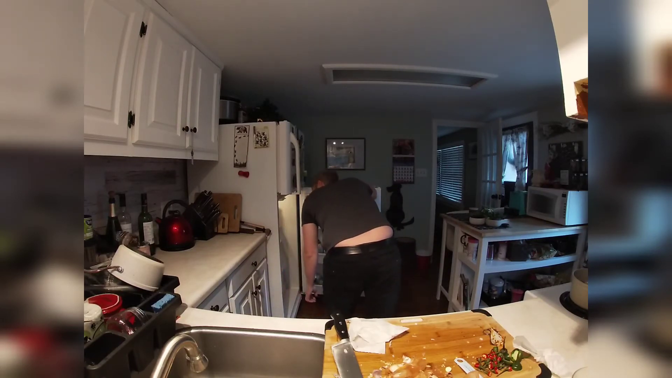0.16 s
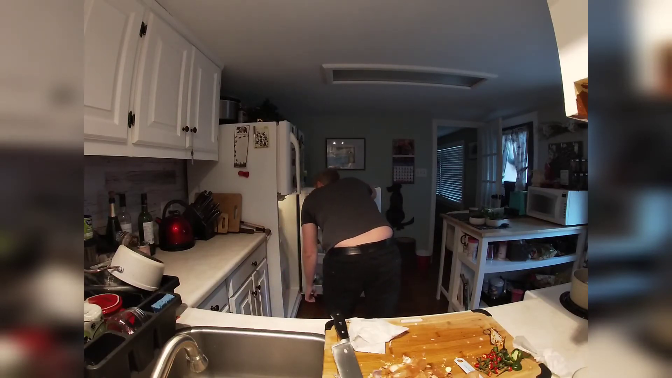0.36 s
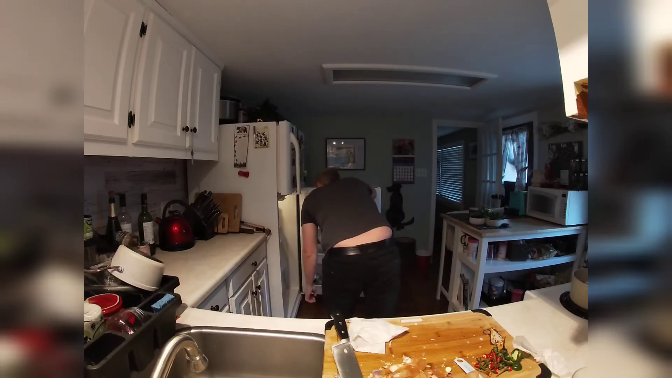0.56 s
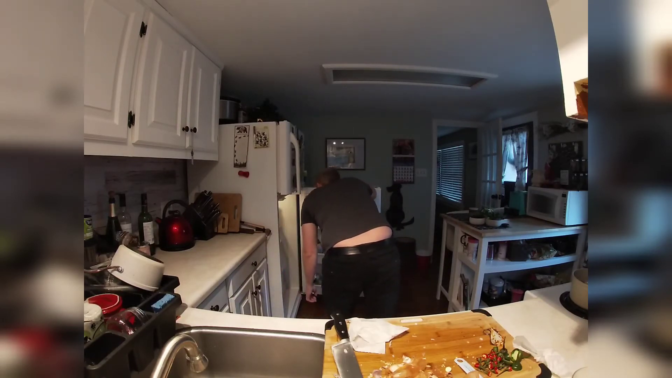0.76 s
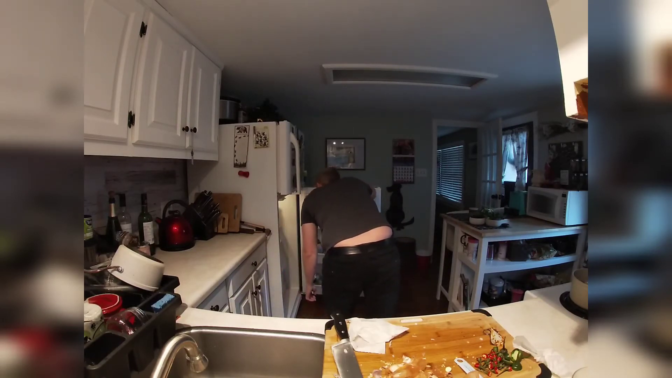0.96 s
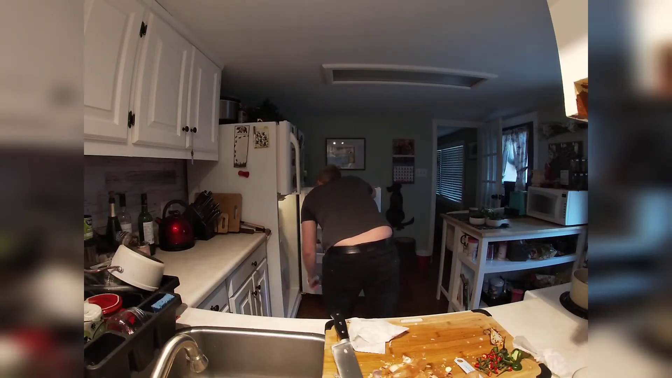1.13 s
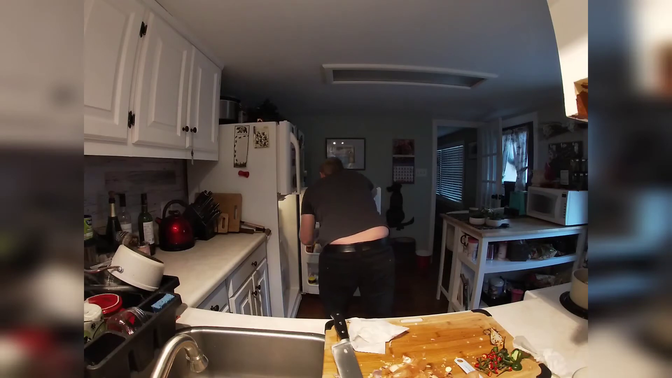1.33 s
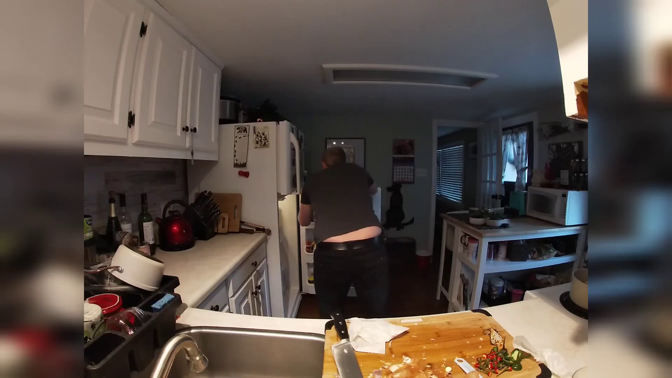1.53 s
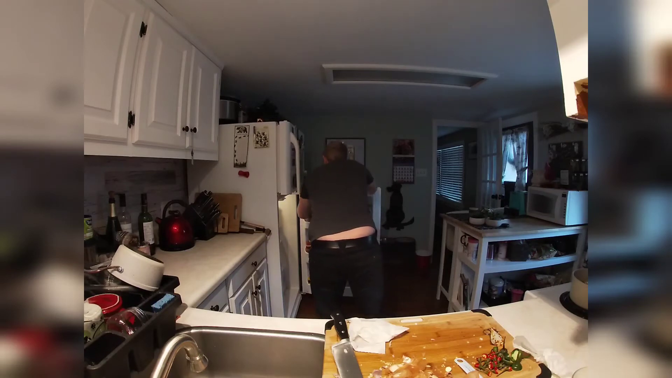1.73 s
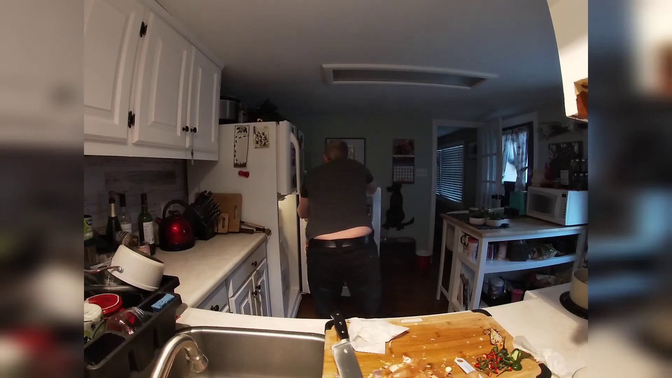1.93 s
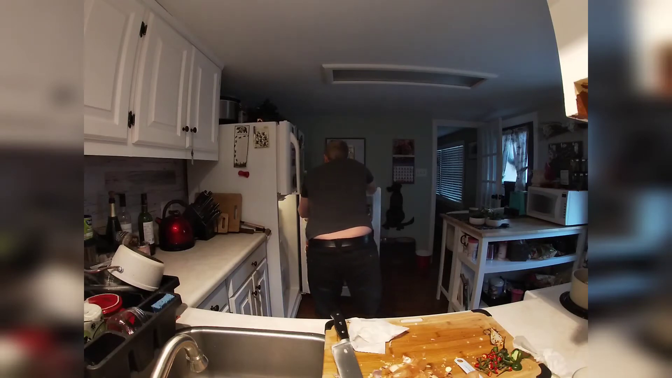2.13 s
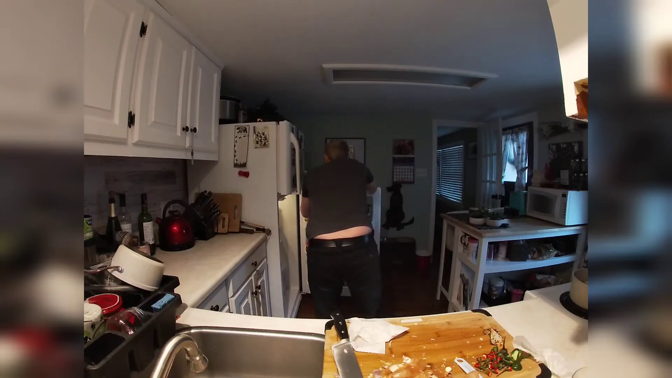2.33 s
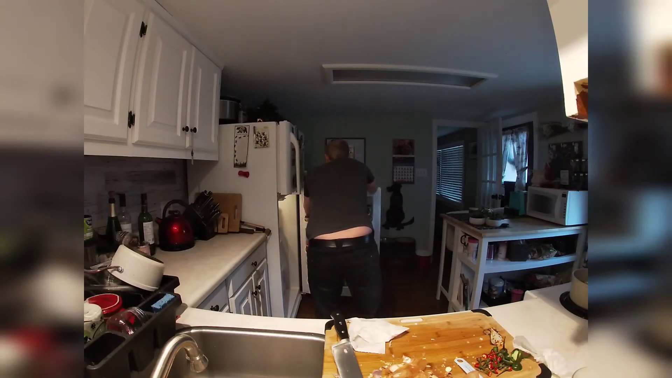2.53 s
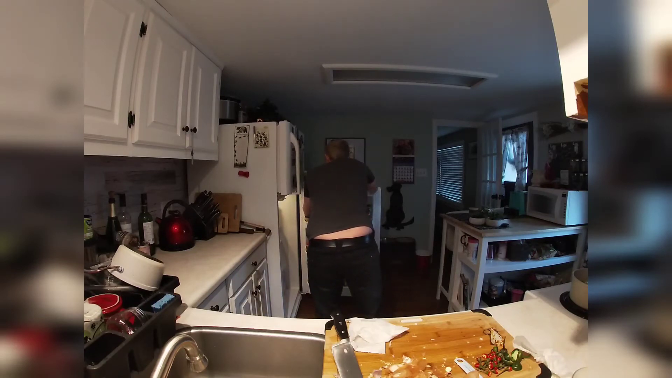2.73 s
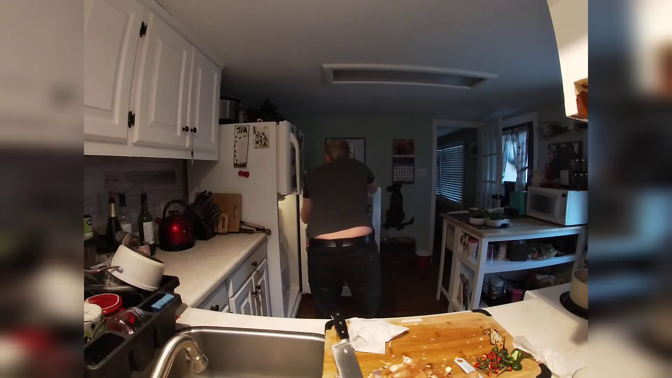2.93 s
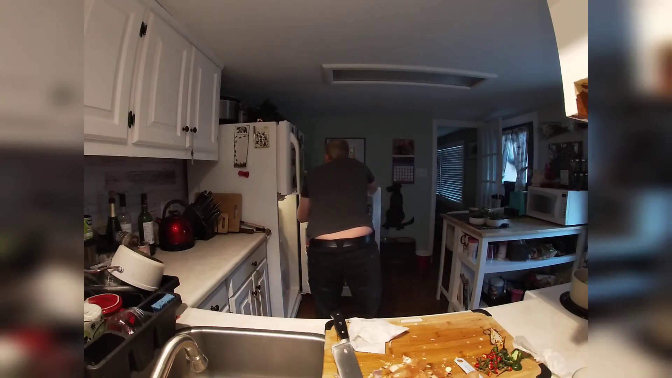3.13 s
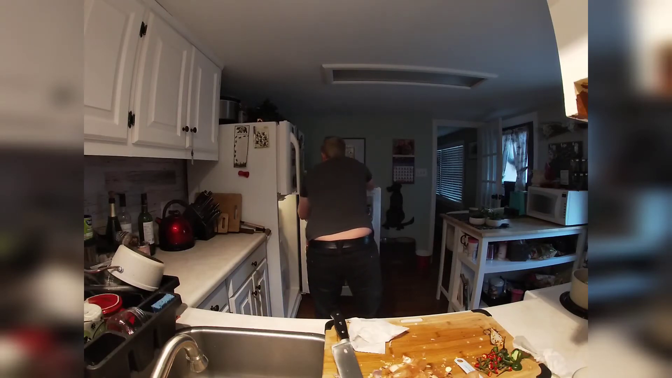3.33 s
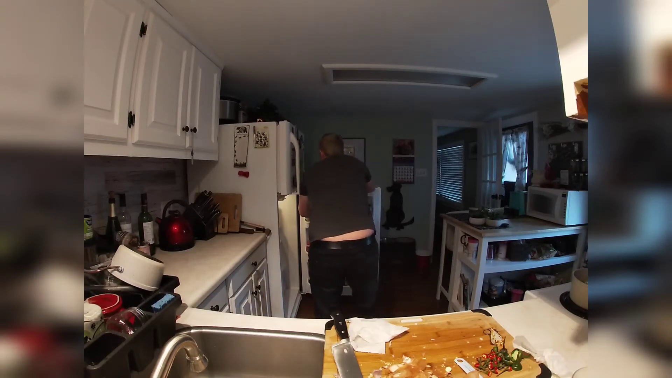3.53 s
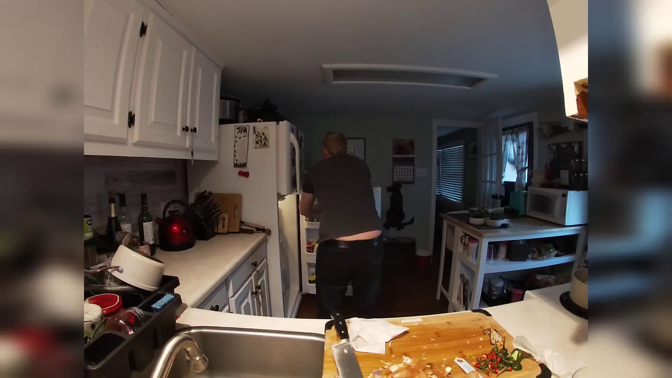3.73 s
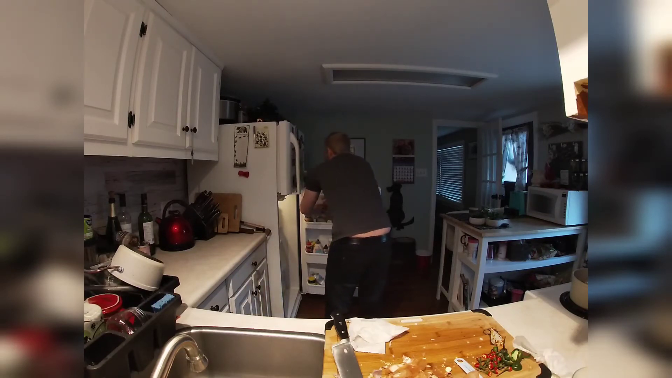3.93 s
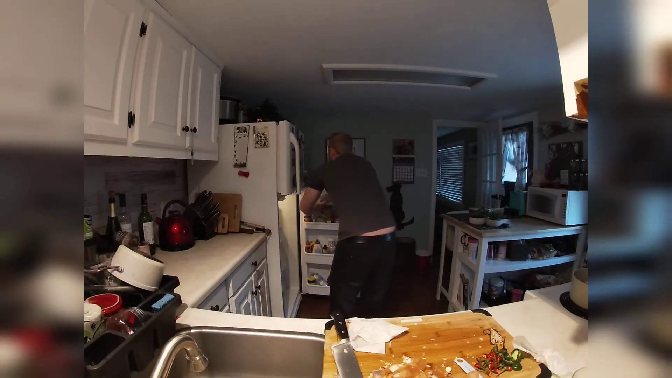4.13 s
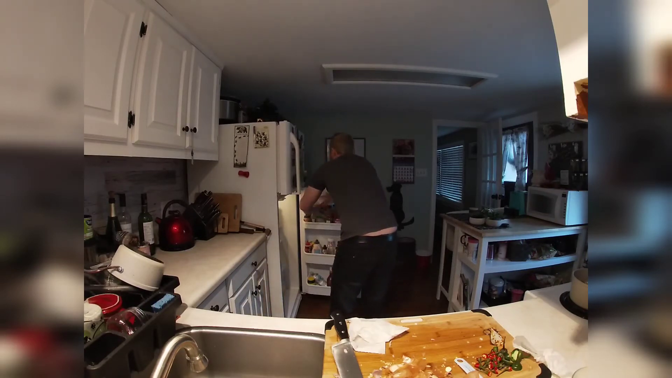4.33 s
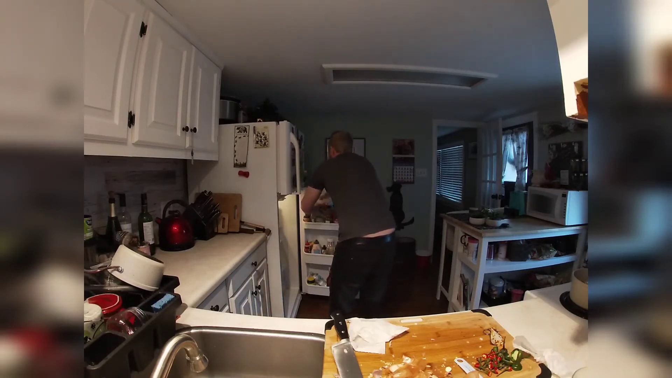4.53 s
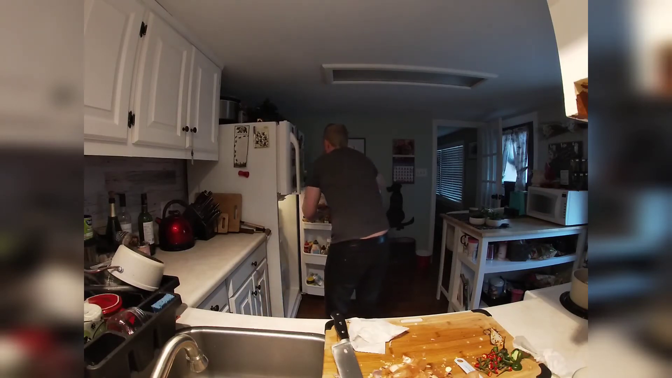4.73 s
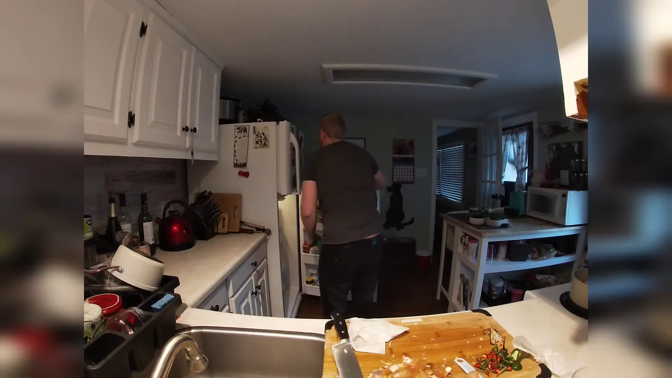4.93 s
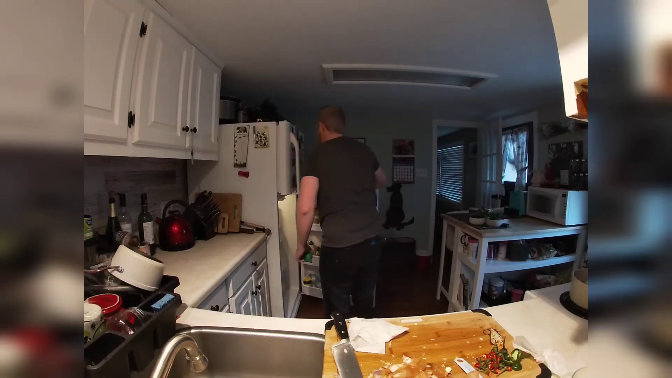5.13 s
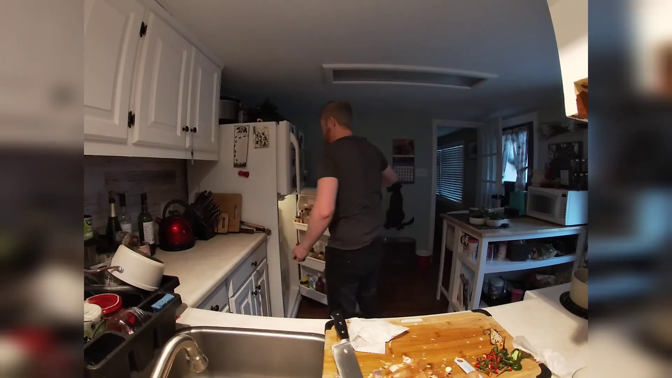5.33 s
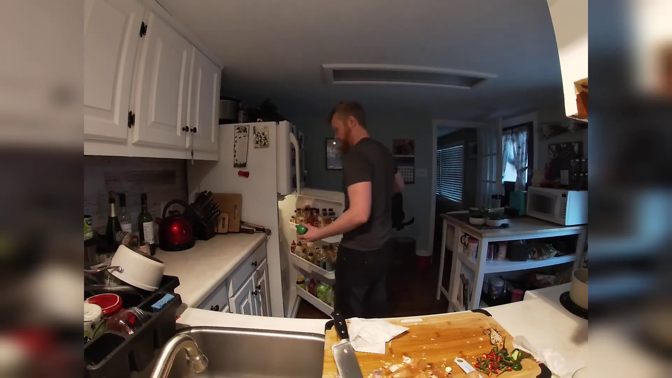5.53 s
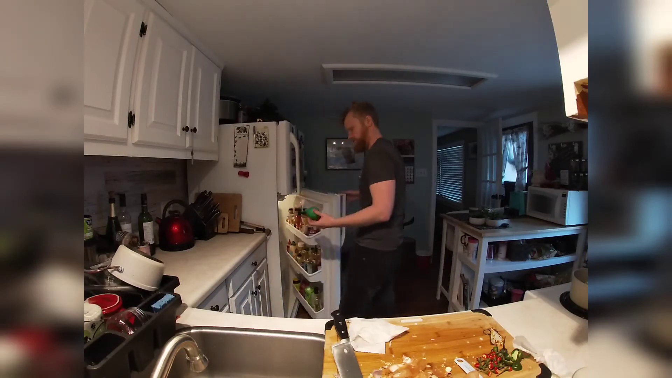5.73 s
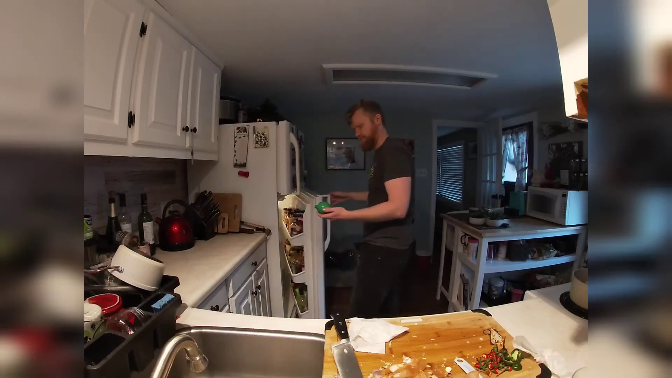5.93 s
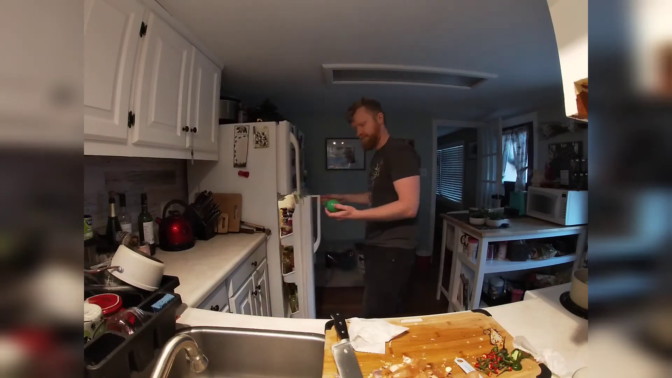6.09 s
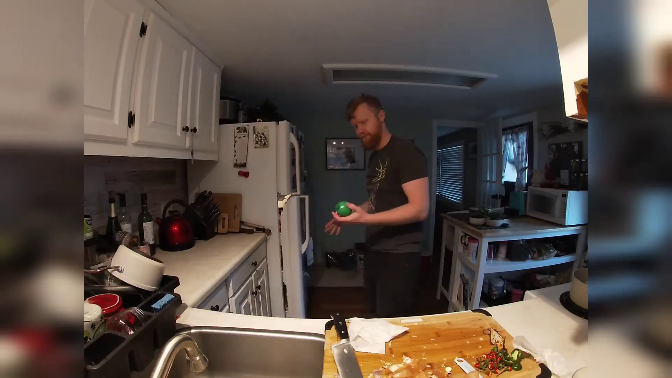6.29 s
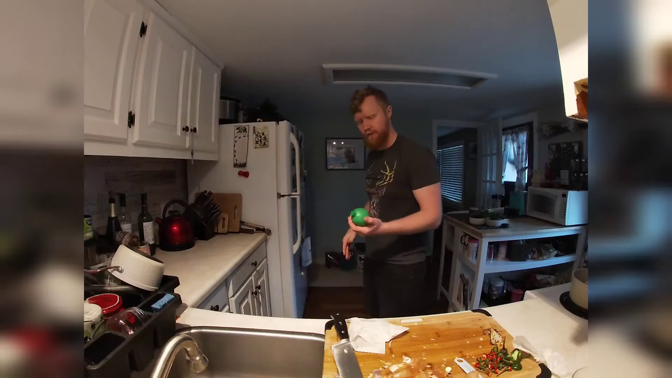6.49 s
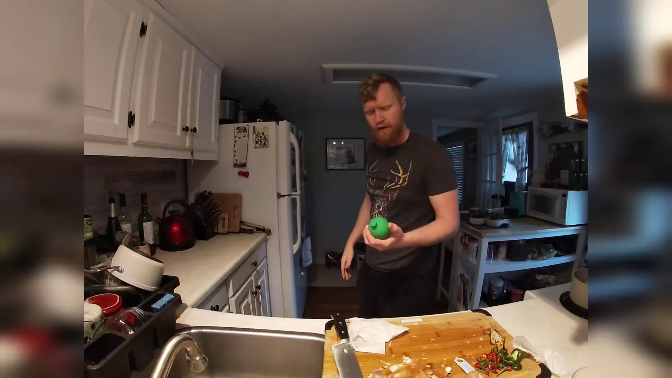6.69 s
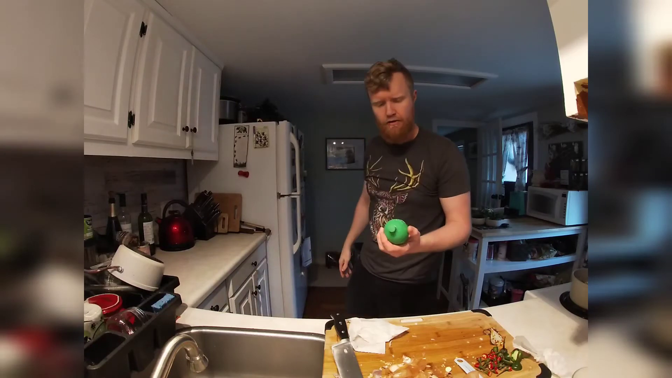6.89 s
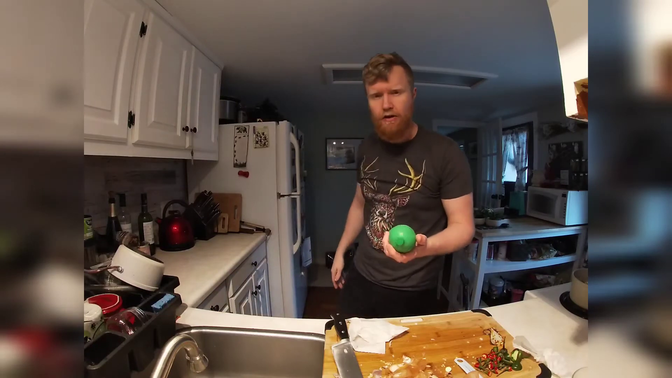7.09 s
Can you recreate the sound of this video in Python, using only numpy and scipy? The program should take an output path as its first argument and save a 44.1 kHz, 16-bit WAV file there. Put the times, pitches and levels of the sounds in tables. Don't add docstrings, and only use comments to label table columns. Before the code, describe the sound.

A refrigerator motor hums with a soft fan rush in a small, hard-walled kitchen. After a quiet start, a plastic drawer rumbles and thuds along its rails. Light bottle nudges and wrapper crinkles follow, then a cluster of sharp clacks, glass clinks and hollow shelf thuds. Faint rustling leads to a loud door slam with deep air thump, rattle and bounce, and the hum is muffled. A small microphone sits nearby.

```python
import sys
import numpy as np
from scipy import signal
from scipy.fft import rfft, irfft
from scipy.io import wavfile
from scipy.ndimage import map_coordinates

SR = 44100
rng = np.random.default_rng(int(sys.argv[2]) if len(sys.argv) > 2 else 0)


def store_pcm(level_fs):
    pcm = np.round(np.clip(level_fs, -1, 1) * 32767).astype(np.int16)
    wavfile.write(sys.argv[1], SR, np.atleast_2d(pcm).T)


def invert_db(x):
    u = np.asarray(x, float) / 20
    return 10 ** u


N = 315403

# start in seconds, strength in dB,
# weight in dB (how much the hollow shelf answers), hardness in dB (how much the edge ticks).
SET_DOWNS = [(1.103, -57, -5, -21), (1.185, -46.5, -20, -8.5), (1.4456, -52, -12, -12),
             (1.8552, -38, -5, -19), (1.8951, -20, -8.5, -13), (1.996, -29, -3, -10.5),
             (2.32, -43.5, 6, -11.5), (2.8654, -59, 8, 2.5), (2.9475, -55.5, 7, -1), (3.1166, -52, -7, -8),
             (3.1626, -51.5, -0.5, -5), (4.403, -35, -8, -6.5), (4.588, -42.5, -8, -9),
             (4.6384, -31.5, 0, -12), (4.7035, -29, -1, -6.5), (4.925, -54, 4, -9),
             (6.489, -29, 1.5, -12.5), (6.9485, -37, -19, -14)]
# start in seconds, strength, weight and hardness in dB.
NUDGES = [(2.2522, -43, 6, -14), (2.6728, -60, 1, -6), (2.736, -51, -18, -1), (3.4191, -51.5, 0, -10),
          (3.8187, -50.5, 8.5, -9), (3.8521, -36.5, -3, -17), (4.1445, -55.5, 17.5, -17),
          (4.4573, -22.5, -0.5, -11), (4.9861, -55, 8, -18)]
# start in seconds, strength, weight and hardness in dB.
SLAPS = [(1.8747, -39, -2, -21), (1.9226, -33.5, -5, -24), (2.0494, -64, 15, 4), (3.636, -45.5, -19.5, -16),
         (3.6977, -56.5, 17, -12), (4.7405, -35, -27, -22), (6.4787, -32, -4, -14), (6.497, -40, 4.5, -17)]
# start in seconds, strength, weight and hardness in dB.
CRACKS = [
    (2.9015, -29.5, -21, -10.5),
    (2.925, -41, -13, -3.5),
    (4.4485, -26.5, -13, -5.5),
    (6.5536, -49, 5, 0),
    (6.5815, -9, -11, -16),
    (6.6672, -21.5, -6.5, -14),
]
# start in seconds, peak in dB, pitch in Hz.
DRAWER_THUDS = [(1.871, -18, 252), (1.905, -9.5, 313), (1.918, -14, 427), (1.939, -19, 302),
                (1.959, -19, 194), (1.979, -16, 190), (1.999, -17.5, 336), (2.024, -15.5, 251),
                (2.049, -16.5, 231), (2.089, -20.5, 209), (2.254, -26, 213)]
# start in seconds, peak in dB, pitch in Hz.
SHELF_THUDS = [(3.802, -31, 129), (4.466, -25, 314), (4.469, -10, 243), (4.519, -19.5, 257),
               (4.549, -26.5, 327), (4.575, -18, 272), (4.609, -23, 300), (4.646, -26.5, 196),
               (4.652, -10.5, 298), (4.669, -15.5, 245.4), (4.69, -17, 272), (4.729, -17.5, 232),
               (4.77, -29, 212)]
# start in seconds, peak in dB, pitch in Hz.
DOOR_THUDS = [
    (6.492, -9.5, 198),
    (6.494, -16, 352),
    (6.509, -17.5, 237),
    (6.56, -21, 196),
    (6.583, -12.5, 114),
    (6.595, -32, 340),
    (6.68, -22, 151),
    (6.683, -30, 335),
]
# frequency in Hz, level in dB, T60 in seconds.
JAR_MODES = [(1232, 0, 0.1), (2630, -6, 0.088), (3200, -6, 0.24), (3840, -4, 0.062), (4530, -22, 0.28),
             (4800, -28, 0.12), (5030, -14, 0.32), (6450, -15, 0.056), (7260, -5, 0.053),
             (7200, -24, 0.091)]
# start in seconds, level in dB, frequency in Hz.
PINGS = [(1.897, -21, 837), (1.898, -23, 3220), (1.898, -32, 6800), (1.901, -34, 1230), (2.321, -37, 1296),
         (2.323, -33, 636), (2.903, -37, 3300), (2.903, -43, 1260), (2.906, -45, 6350), (2.907, -45, 7500),
         (3.117, -46.5, 7160), (3.819, -48, 3240), (3.852, -39, 3380), (3.86, -38, 906), (4.460, -26, 3120),
         (4.462, -28, 1680), (4.463, -28, 7360), (4.575, -44, 1405), (4.645, -33, 850), (4.99, -50, 4470),
         (6.493, -21, 697), (6.494, -27, 2230), (6.496, -27.5, 2630)]
# time in seconds, level in dB, tilt to the upper bands in dB.
SKID = [(.40, -94, 17), (.415, -72, 17), (.445, -57, -1), (.475, -48.5, -14), (.505, -58.5, -17),
        (.535, -87, -14), (.56, -110, -13)]
# frequency in Hz, width in Hz, level in dB.
SKID_BANDS = [(1770, 300, 0), (2900, 1600, -9), (3850, 700, -9), (4600, 900, -10), (6950, 250, -16),
              (11300, 900, -22)]
# start in seconds, level in dB.
CLIPS = [(1.997, -50), (2.9, -53), (4.01, -58), (6.488, -51), (6.553, -43), (6.5815, -34)]
# start in seconds, hold in seconds, rumble in dB, rattle in dB.
SHAKES = [(1.802, 0.056, -43, -63), (1.861, 0.065, -46, -38), (1.951, 0.086, -38.5, -37.5),
          (2.301, 0.033, -60, -57), (3.41, .05, -50, -70), (3.688, 0.046, -51, -55.5),
          (3.789, 0.027, -51.5, -64), (3.85, .02, -54, -65), (4.132, 0.011, -45, -55),
          (4.436, 0.015, -32, -45), (4.562, .015, -50, -62), (4.635, 0.043, -38, -51),
          (4.912, 0.08, -64, -58), (6.49, 0.028, -50, -54), (6.566, 0.012, -33, -41),
          (6.658, .02, -46.5, -52)]
# frequency in Hz, level in dB, T60 in seconds.
SHELF_MODES = [(113.3, -14, 0.13), (212, -3, 0.1), (252, 10, 0.18), (331, 5.5, 0.15), (420, -15, 0.084)]
# frequency in Hz, width in Hz, level in dB.
DRAWER_WALLS = [(774, 140, -9), (1414, 105, 4), (1685, 79, -0.5), (1863, 22, 7), (2850, 99, -15.5),
                (3100, 38, -12.5)]
# start in seconds, hold in seconds, level in dB, brightness in dB.
RUMMAGES = [(1.433, 0.17, -68.5, -1), (1.757, .04, -58, -4), (2.055, 0.14, -56.5, -0.5),
            (3.403, 0.09, -60.5, -1), (3.596, 0.045, -55, -3.5), (3.675, 0.016, -57, -4.5),
            (3.896, 0.062, -61.5, 1.5), (3.978, 0.024, -53, -1), (4.18, 0.27, -54.5, -0.2),
            (4.497, .01, -56, -6), (4.544, 0.007, -54, -5.5), (4.762, 0.043, -57, -3.5),
            (4.942, 0.024, -61.5, -2.5), (5.09, 0.11, -66, -2.5), (5.354, 0.39, -66, -1.5),
            (5.85, .3, -73, -1.5), (6.206, .25, -65, -3), (6.934, 0.018, -53, -3.5), (6.996, .15, -64, -8)]
# frequency in Hz, density in dB per Hz.
CRINKLE_SPECTRUM = [(880, -2), (1500, -2.5), (1930, -6), (2040, -7.5), (3320, -3), (3850, -6), (6450, -4.5),
                    (7140, -3.5), (9020, -17.5), (12500, -24), (14000, -37)]
# time in seconds, level in dB.
MOTOR_LEVEL = [(0, -43), (1.1, -39.5), (2.07, -44.5), (2.4, -42), (4.4, -39.5), (4.62, -46), (4.8, -42.5),
               (6.49, -42.5), (6.8, -61), (7.15, -46)]
# frequency in Hz, width in Hz, level in dB.
WHINES = [(179.2, 6, 0), (364.2, 20, -11.5), (508.8, 23.5, -17), (1259.4, 60, -26), (1968, 11.7, -32)]
# frequency in Hz, density in dB per Hz.
FAN_SPECTRUM = [(18, -24.5), (30, -19), (123, -9.5), (144, -9.5), (160, -11.5), (181, -3), (206, -7),
                (296, -4.5), (383, -17.5), (508, -14), (991, -29.5), (1930, -34.5), (2370, -44),
                (7360, -47), (14000, -78)]
# start in seconds, hold in seconds, level in dB.
SHUDDERS = [
    (3.7, 0.11, -58),
    (4.5, 0.064, -46),
    (6.5, 0.065, -34.5),
    (6.9, .25, -55),
]
# start in seconds, hold in seconds, level in dB.
GUSTS = [(.56, .05, -52), (1.98, 0.096, -45), (3.4, 0.26, -49), (3.76, .01, -31.5), (3.9, 0.33, -53),
         (4.47, 0.33, -50), (4.9, 0.19, -49), (5.68, 0.041, -46), (6.0, 0.23, -58), (6.44, 0.31, -48),
         (6.70, 0.085, -34.5)]
# start in seconds, peak in dB, frequency in Hz, T60 in seconds.
JOLTS = [
    (2.043, -26, 110, 0.42),
    (3.795, -27.5, 17.7, 0.43),
    (4.639, -21.5, 99, 0.21),
    (4.83, -36, 95, 0.19),
    (4.961, -36.5, 105, 0.35),
    (6.499, -22, 25, 0.27),
    (6.597, -5.5, 24.6, 0.19),
    (6.699, -10, 104, 0.086),
    (6.899, -27, 98, 0.12),
]


def rms_one(x):
    return x / np.sqrt(np.mean(x ** 2) + 1e-20)


def in_time(rows):
    seconds, *columns = np.transpose(rows)
    return [np.interp(np.arange(N) / SR, seconds, column) for column in columns]


def band(x, low_hz, high_hz, order=2):
    return signal.sosfilt(signal.butter(order, [low_hz, high_hz], "band", fs=SR, output="sos"), x)


def drift(rate_hz):
    knots = rng.standard_normal(int(N / SR * rate_hz * 2) + 400)
    position = np.arange(N) / SR * rate_hz * 2
    return map_coordinates(knots, [position], order=2)


def coloured(spectrum):
    hz, db = np.transpose(spectrum)
    log_hz = np.log(np.fft.rfftfreq(N, 1 / SR) + 1)
    gain = invert_db(np.interp(log_hz, np.log(hz), db))
    return rms_one(irfft(rfft(rng.standard_normal(N)) * gain, N))


def resonate(x, hz, width_hz):
    r = np.exp(-np.pi * width_hz / SR)
    feedback = [1, -2 * r * np.cos(2 * np.pi * hz / SR), r * r]
    return signal.lfilter(np.array([1, 0, -1]) * (1 - r * r) / 2, feedback, x)


def narrow_noise(x, hz, width_hz):
    return rms_one(resonate(resonate(x, hz, width_hz), hz, width_hz))


def ring(clicks, hz, t60):
    r = invert_db(-60 / (t60 * SR))
    w = 2 * np.pi * hz / SR
    return signal.lfilter([0, np.sin(w)], [1, -2 * r * np.cos(w), r * r], clicks + 1e-18)


def grains(per_s, spread_db):
    sizes = invert_db(spread_db * np.minimum(rng.exponential(1, N), 4)) * rng.choice([-1, 1], N)
    return rms_one(sizes * (rng.random(N) < per_s / SR))


def strikes(seconds, level_db):
    clicks = np.zeros(N)
    clicks[(np.asarray(seconds) * SR).astype(int)] = invert_db(level_db)
    return clicks


def swell(t, t60, rise_s):
    return (1 - np.exp(-t / rise_s)) * invert_db(-60 * t / t60)


def strokes(rows, attack_s, t60):
    t, out = np.arange(SR) / SR, np.zeros(N + SR)
    for s, hold, db in rows:
        rise = np.clip(t / attack_s, 0, 1) ** 2
        fall_db = -60 * np.maximum(t - attack_s - hold, 0) / t60
        start = int(s * SR)
        out[start:start + SR] += rise * invert_db(db + fall_db)
    return out[:N]


def knocks():
    t = np.arange(SR // 4) / SR
    levels = np.zeros((4, N + SR))
    # contacts, body in dB over the mean of clack and hollow, chatter T60 in seconds
    for rows, body_db, t60 in [(SET_DOWNS, -3.5, 0.088), (NUDGES, -11.5, 0.078),
                               (SLAPS, 5.9, 0.078), (CRACKS, -1.3, 0.044)]:
        shape = swell(t, t60, rise_s=0.0014)
        for s, db, weight_db, hard_db in rows:
            hollow, body = weight_db + 14.5, weight_db / 2 + body_db + 11
            clack, tick = 3.0, hard_db + 9.5
            registers_db = db + np.array([[hollow], [body], [clack], [tick]])
            start = int(s * SR)
            levels[:, start:start + len(t)] += invert_db(registers_db) * shape
    chatter = [grains(16000, spread_db=2.0) * level for level in levels[:, :N]]
    edges_hz = [450, 1100, 2800, 5000, 8300]
    registers = sum(band(chatter[k], edges_hz[k], edges_hz[k + 1], order=4) for k in range(4))
    sharpest_edge = band(chatter[3], 5700, 14000) * invert_db(-20.0)
    return registers + sharpest_edge


def thuds():
    t, out = np.arange(SR // 3) / SR, np.zeros(N + SR)
    modes = [(0.973, 1.0), (0.714, 0.15), (1.37, 0.34)]
    for rows, t60 in [(DRAWER_THUDS, 0.077), (SHELF_THUDS, 0.079), (DOOR_THUDS, 0.12)]:
        for s, db, hz in rows:
            tone = sum(gain * np.sin(2 * np.pi * hz * ratio * t) for ratio, gain in modes)
            start = int(s * SR)
            out[start:start + len(t)] += invert_db(db) * tone * swell(t, t60, rise_s=0.0016)
    return out[:N]


def glass():
    clink_s, clink_db = 4.706, -27.5
    ping_t60_s, ping_loss = 0.06, 0.3
    clink = sum(ring(strikes([clink_s], clink_db + db), hz, min(t60, 0.2) * 0.54) for hz, db, t60 in JAR_MODES)
    pings = sum(ring(strikes([s], db), hz, ping_t60_s * (1e3 / hz) ** ping_loss) for s, db, hz in PINGS)
    return clink + pings


def skid():
    level_db, tilt_db = in_time(SKID)
    rub = grains(6600, spread_db=4.0)
    bands = [invert_db(db) * narrow_noise(rub, hz, width) for hz, width, db in SKID_BANDS]
    return invert_db(level_db) * (sum(bands[:3]) + invert_db(tilt_db) * sum(bands[3:]))


def clips():
    level = strokes([(s, 0, db) for s, db in CLIPS], attack_s=0.001, t60=0.063)
    return band(level * grains(9000, spread_db=1.0), 7500, 11300)


def slides():
    attack_s, t60_s = 0.014, 0.29
    rumble_level = strokes([(s, hold, db) for s, hold, db, _ in SHAKES], attack_s, t60_s)
    rattle_level = strokes([(s, hold, db) for s, hold, _, db in SHAKES], attack_s, t60_s)
    slips = grains(2500, spread_db=3.5)
    rumble = sum(invert_db(db) * resonate(slips, hz, 5 / t60) for hz, db, t60 in SHELF_MODES)
    walls = sum(invert_db(db) * (-1) ** k * resonate(slips, hz, width)
                for k, (hz, width, db) in enumerate(DRAWER_WALLS))
    rattle = rms_one(walls) + 0.63 * rms_one(band(slips, 410, 2130))
    return rumble_level * rms_one(rumble) + rattle_level * rms_one(rattle)


def rustle():
    attack_s, t60_s = 0.024, 0.43
    low = strokes([(s, hold, db - tilt) for s, hold, db, tilt in RUMMAGES], attack_s, t60_s)
    high = strokes([(s, hold, db + tilt) for s, hold, db, tilt in RUMMAGES], attack_s, t60_s)
    crinkle = coloured(CRINKLE_SPECTRUM) * invert_db(1.5 * drift(30))
    dull = signal.lfilter(*signal.butter(2, 4000, fs=SR), crinkle)
    return low * dull + high * (crinkle - dull)


def fridge():
    motor_db, = in_time(MOTOR_LEVEL)
    hum_hz = WHINES[0][0] + 1.603 * drift(6)
    phase = 2 * np.pi * np.cumsum(hum_hz) / SR
    hum = np.sqrt(2) * np.sin(phase) * invert_db(1.17 * drift(12))
    white = rng.standard_normal(N)
    whines = sum(invert_db(db) * narrow_noise(white, hz, width) for hz, width, db in WHINES[1:])
    draught = invert_db(-46) + strokes(SHUDDERS, attack_s=0.059, t60=0.68)
    rush = coloured(FAN_SPECTRUM)
    flutter = band(rush, 4500, 9500) * 0.25 * np.cos(phase / 6)
    return invert_db(motor_db) * (hum + whines) + invert_db(1.5) * draught * (rush + flutter)


def air():
    level = invert_db(-57.5) + strokes(GUSTS, attack_s=0.031, t60=0.4)
    out = level * rms_one(band(rng.standard_normal(N), 14.0, 44, order=3))
    for s, db, hz, t60 in JOLTS:
        t = np.maximum(np.arange(N) / SR - s, 0)
        out -= invert_db(db - 60 * t / t60) * np.sin(2 * np.pi * hz * t)
    return out


def kitchen(x):
    t60_s, echo_db = 0.2, -3.5
    t = np.arange(SR // 2) / SR
    noise = rng.standard_normal(len(t)) * (t > 0.004)
    low = signal.lfilter(*signal.butter(1, 3000, fs=SR), noise)
    echo = low * invert_db(-60 * t / t60_s) + (noise - low) * invert_db(-60 * t / (0.92 * t60_s))
    echo /= np.sqrt(np.sum(echo ** 2))
    return x + invert_db(echo_db) * signal.fftconvolve(x, echo)[:N]


def scene():
    handled = knocks() + thuds() + glass() + skid() + clips() + slides() + rustle()
    return (kitchen(handled) + fridge() + air())[None]


def band_limit(x):
    return signal.sosfilt(signal.butter(12, 15530, fs=SR, output="sos"), x)


def record(dry):
    heard = signal.sosfilt(signal.butter(2, 9000, fs=SR, output="sos"), dry)
    heard = signal.sosfilt(signal.butter(8, 14700, fs=SR, output="sos"), heard)
    hiss = rms_one(band(rng.standard_normal(N), 8500, 12300, order=4))
    heard = heard + invert_db(-91) * hiss
    return band_limit(0.52 * np.tanh(heard / 0.71))


dry = scene()
out = record(dry)
store_pcm(out)
```